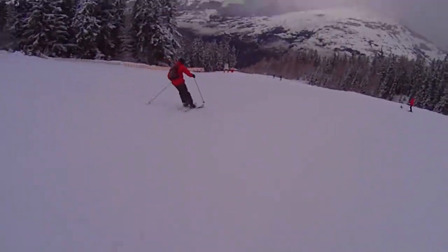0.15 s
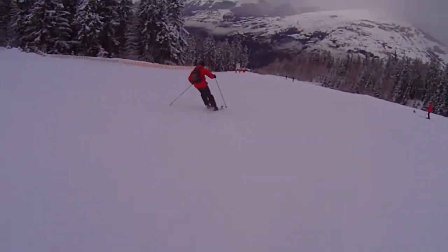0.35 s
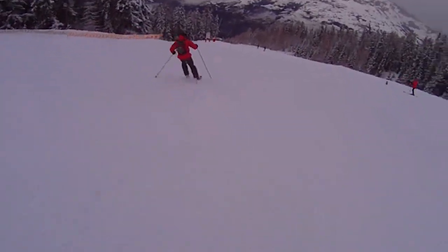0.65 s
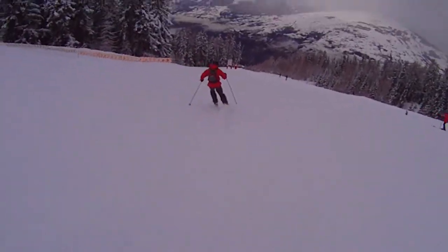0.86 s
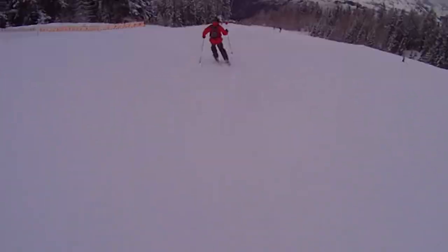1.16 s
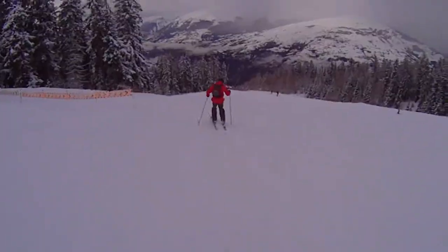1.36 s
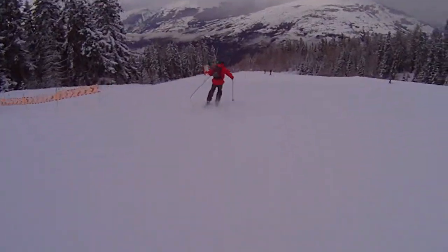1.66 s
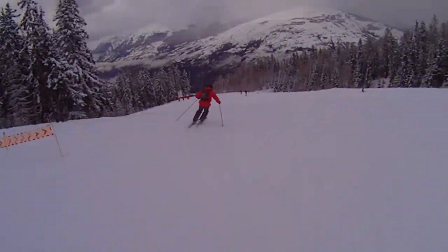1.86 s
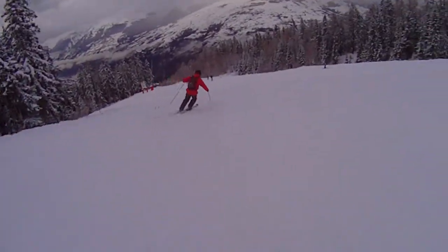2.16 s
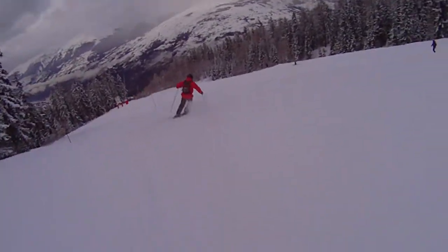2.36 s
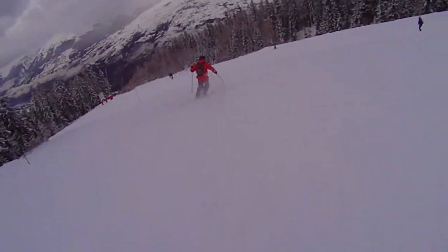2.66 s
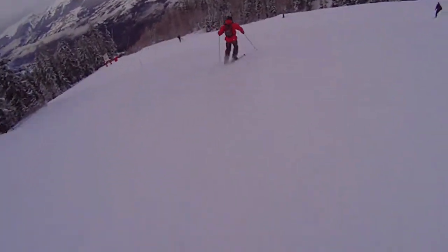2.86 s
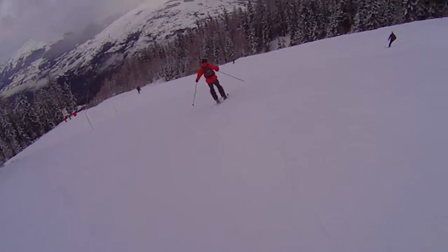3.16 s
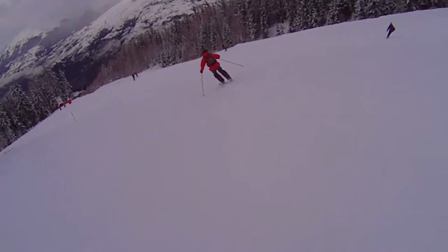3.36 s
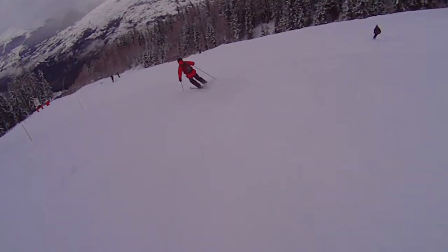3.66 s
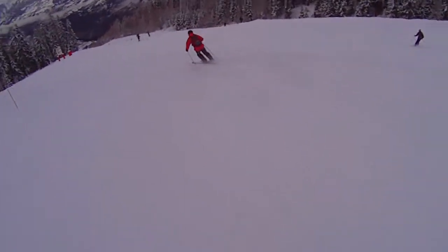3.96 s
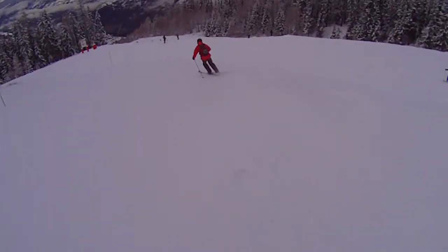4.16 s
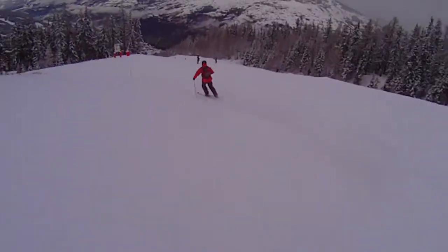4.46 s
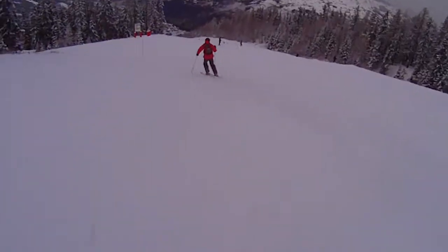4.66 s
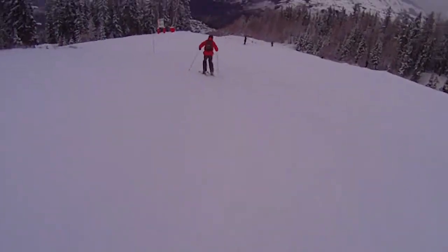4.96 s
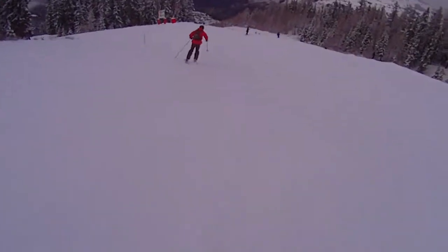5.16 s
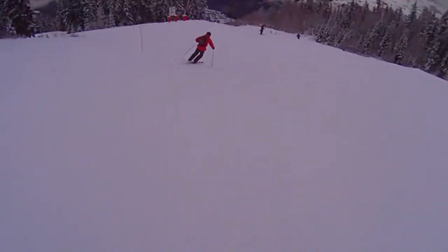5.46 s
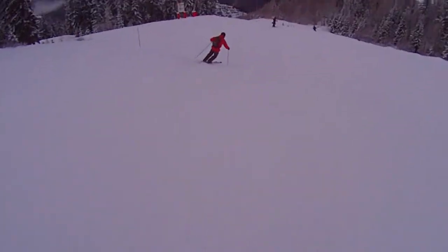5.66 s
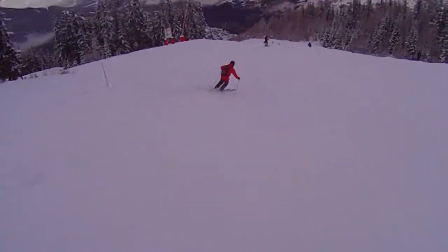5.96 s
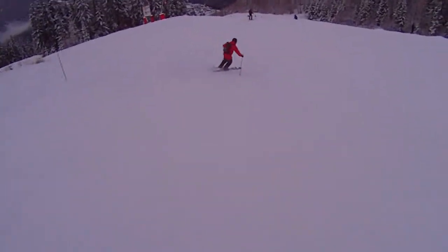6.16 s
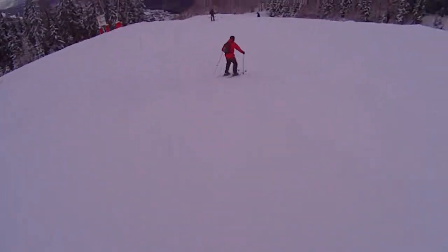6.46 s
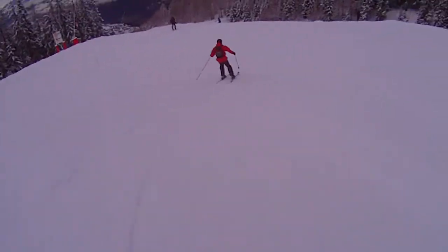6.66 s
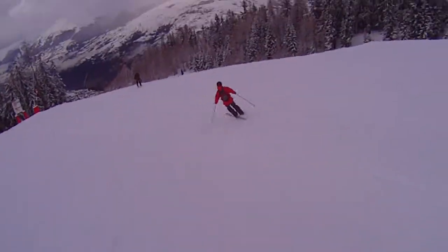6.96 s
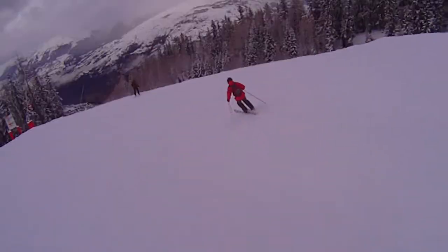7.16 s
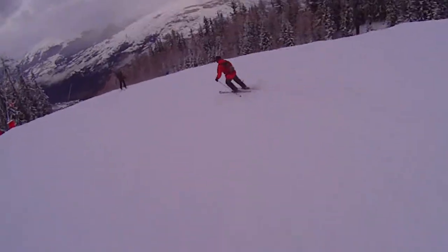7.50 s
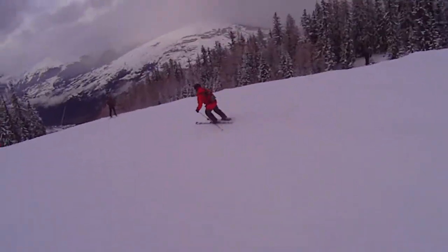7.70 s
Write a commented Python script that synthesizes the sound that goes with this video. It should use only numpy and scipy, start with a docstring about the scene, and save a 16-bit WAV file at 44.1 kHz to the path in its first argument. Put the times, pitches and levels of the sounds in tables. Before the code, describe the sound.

A small camera microphone in a plastic housing rides close to skis on packed snow. For the first second there is mostly a quiet, grainy gliding rustle with a boxy ring, faint hiss and a very faint high electronic whine. Around 1.2 s edges begin to grip, and hollow resonant skids slide upward to 1.7 s. Rough scraping continues to about 4.1 s, wavering, duller and chattering near 2 to 2.5 s, with sharp slaps near 1.9, 2.9 and 3.3 s. From 4.1 to 6 s the skis glide more quietly, broken by knocks, short edge scuffs and a fluttering wind tone. At 6 s hard scraping returns with brief airy whistles, peaks near 6.9 s, dips, then comes in gritty bursts with low hollow skids to the end. Bright snow ticks strike the housing, especially around 5.5, 6.9 and 7.3 s.

```python
"""Skiing down a packed piste

Heard from a small camera microphone in a plastic housing, close to the skis, wind and thrown snow.
Flat skis rustle as filtered grain noise; in turns the edges scrape in bands of grains that bunch and waver,
with sliding resonances for skids and short bursts for slaps over ruts. Wind is unsteady tones and low noise;
thrown snow is bright clicks and noise on the housing; the electronics are steady sines over a faint hiss."""
import sys
import numpy as np
from scipy import signal
from scipy.fft import rfft, irfft
from scipy.io import wavfile

SR = 44100
rng = np.random.default_rng(int(sys.argv[2]) if len(sys.argv) > 2 else 0)


def to_wav(s):
    """Save 16-bit WAV."""
    ch = np.atleast_2d(s).T  # columns
    pcm = np.round(np.clip(ch, -1, 1) * 32767)  # PCM
    wavfile.write(sys.argv[1], SR, pcm.astype(np.int16))


N = 345303
TIME = np.arange(N) / SR  # seconds


def from_db(db):
    """Decibels to gain."""
    return 10 ** (np.asarray(db) / 20)


def rms_one(x):
    """Scale to unit rms."""
    return x / np.sqrt(np.mean(x ** 2) + 1e-20)


def in_time(rows):
    """Interpolate each column of a table, after its time column, to every sample."""
    seconds, *columns = np.transpose(rows)
    return [np.interp(TIME, seconds, column) for column in columns]


def swell(s, half_length, db):
    """A bell-shaped rise and fall round time s, as a gain; half_length in s is where it drops to 1/e."""
    gain = np.zeros(N)
    near = np.abs(TIME - s) < 4 * half_length
    gain[near] = from_db(db) * np.exp(-((TIME[near] - s) / half_length) ** 2)
    return gain


def drift(rate):
    """Smooth random wander of rms 1 that changes about rate times a second."""
    step = 20  # samples between the slow values
    pole = np.exp(-2 * np.pi * rate * step / SR)
    settle = 4000  # slow values dropped while the filter settles
    noise = rng.standard_normal(N // step + settle + 2)
    slow = signal.lfilter([1], [1, -2 * pole, pole * pole], noise)[settle:]
    return np.interp(np.arange(N) / step, np.arange(len(slow)), rms_one(slow))


def colour(x, spectrum, size=2048):
    """Causal minimum-phase filter with the given spectrum; white noise keeps its power."""
    hz, db = np.transpose(spectrum)
    grid = np.maximum(np.arange(size // 2 + 1) * SR / size, 1)
    # beyond the listed range the response falls away on both sides
    outside = np.minimum(grid / hz[0], 1) * np.minimum(hz[-1] / grid, 1) ** 2
    gain = rms_one(from_db(np.interp(np.log(grid), np.log(hz), db)) * outside)
    # folding the cepstrum puts all the energy as early as it can be
    cepstrum = irfft(np.log(gain))[:size // 2]
    cepstrum[1:] *= 2
    response = irfft(np.exp(rfft(cepstrum, size)))
    return signal.oaconvolve(x, response)[:N]


def cut(x, hz, kind, order=4):
    """Butterworth filter."""
    return signal.sosfilt(signal.butter(order, hz, kind, fs=SR, output="sos"), x)


def grains(per_s, spread_db):
    """Snow crystals break at random: many small clicks, a few large; rms 1."""
    sizes = from_db(spread_db * np.minimum(rng.exponential(1, N), 4))
    signs = rng.choice([-1, 1], N)
    breaks = rng.random(N) < per_s / SR
    return rms_one(sizes * signs * breaks)


# Steady whine of the camera electronics. Each row: pitch in Hz, rms level in dB.
WHINE_TONES = [(7777, -91), (7837.5, -80.5), (7897.3, -79.5), (7957.3, -87)]
SELF_NOISE_DB = -71.5  # even hiss, rms


def electronics():
    """Steady sines and a narrow band of noise round them, over an even hiss."""
    whine = sum(from_db(db) * np.sqrt(2) * np.sin(2 * np.pi * hz * TIME) for hz, db in WHINE_TONES)
    noisy_edge = rms_one(cut(rng.standard_normal(N), [7600, 8250], "band", order=1))
    hiss = rms_one(cut(rng.standard_normal(N), 8200, "low", order=1))
    return whine + from_db(-75.5) * noisy_edge + from_db(SELF_NOISE_DB) * hiss


def air_tone(hz, waver_hz, flutter_db):
    """Eddies shed from an edge make a narrow tone, unsteady in pitch and level; rms 1."""
    phase = 2 * np.pi * np.cumsum(hz + waver_hz * drift(72.3)) / SR
    return rms_one(from_db(flutter_db * drift(40)) * np.sin(phase))


# Airstream tone at the housing's edge. Each row: time in seconds, pitch in Hz, level in dB.
EDGE_TONE = [(0, 1100, -78), (.6, 1025, -51), (.8, 983, -50), (1.15, 1110, -42.5), (1.5, 998, -58),
             (4.2, 867, -51), (4.35, 955, -51), (4.5, 900, -53), (4.75, 916, -53), (4.98, 1020, -45.5),
             (5.25, 907, -49.5), (5.7, 965, -45), (7.83, 1095, -53)]
# A gust whistles in a gap. Each row: centre in seconds, half length in seconds, pitch in Hz, level in dB.
WHISTLES = [(6.063, 0.037, 1330, -28), (6.148, 0.007, 1260, -17), (6.384, 0.032, 1266, -24)]
# A gust presses on the housing. Each row: centre in seconds, half length in seconds,
# peak level in dB before the lumpiness.
GUSTS = [(1.895, 0.14, -48), (2.498, .25, -47), (3.5, 0.28, -65), (4.654, 0.075, -51), (4.813, .035, -49),
         (5.504, 0.32, -62.5), (7.42, 0.2, -44.5)]
BREEZE_DB = -72  # buffeting between the gusts, before the lumpiness


def wind():
    """Eddies give an edge tone and brief whistles; gusts swell a soft, lumpy low noise."""
    gusts = from_db(BREEZE_DB) + sum(swell(s, length, db) for s, length, db in GUSTS)
    eddies = rms_one(cut(rng.standard_normal(N), [48, 170], "band", order=2))
    lumpiness = from_db(1.0 + 1.9 * drift(9.7))
    buffet = eddies * gusts * lumpiness
    tone_hz, tone_db = in_time(EDGE_TONE)
    edge_tone = from_db(tone_db) * air_tone(tone_hz, waver_hz=44, flutter_db=3.5)
    whistles = 0
    for s, length, hz, db in WHISTLES:
        whistles = whistles + swell(s, length, db) * air_tone(hz, waver_hz=14, flutter_db=1.8)
    return edge_tone + whistles + buffet


# A lump of snow hits the housing. Each row: time in seconds, strength in dB before a fixed boost and colour.
LUMPS = [(1.3214, -39), (2.7144, -39), (4.8359, -43), (5.5104, -34), (5.5344, -46), (5.667, -47),
         (6.8915, -27), (7.2779, -48), (7.307, -31), (7.3462, -45), (7.3816, -33), (7.4014, -42),
         (7.642, -36.5), (7.7927, -49)]
# Fine snow sprays on the housing. Each row: centre in seconds, half length in seconds, peak level in dB.
SPRAY = [(2.723, 0.033, -61), (5.536, 0.016, -53.5), (5.676, 0.02, -59), (7.356, 0.1, -55),
         (7.63, 0.075, -65), (7.81, 0.033, -58)]
# A puff of powder brushes the housing: centre in seconds, half length in seconds, peak level in dB.
POWDER = (0.54, 0.12, -65)
# Thin, bright colour of snow on the housing. Each row: frequency in Hz, relative density in dB per Hz.
TICK_COLOUR = [(2000, -20), (5000, -11), (7000, -4), (9000, -4), (11500, -9), (15000, -18)]


def thrown_snow():
    """Lumps, fine spray and powder strike the housing directly, so they sound thin and bright."""
    clouds = sum(swell(s, length, db) for s, length, db in SPRAY)
    spray = clouds * grains(per_s=260, spread_db=2.5)
    powder = swell(*POWDER) * rng.standard_normal(N)
    hits = spray + powder
    for s, strength_db in LUMPS:
        hits[round(s * SR)] += from_db(strength_db + 6.0)
    return colour(hits, TICK_COLOUR)


# The bases running flat. Each row: time in seconds, level in dB before a fixed trim and the quick scratches.
GLIDE_LEVEL = [(0, -41.5), (.15, -41), (.35, -36.5), (.8, -38.5), (1.2, -37), (4.1, -40.5), (4.6, -38.5),
               (4.95, -39), (5.17, -31.5), (5.3, -41.5), (5.7, -37), (7.83, -36)]
# Colour of the rustle with the housing's ring. Each row: frequency in Hz, relative density in dB per Hz.
GLIDE_COLOUR = [(40, -30.5), (170, -19), (450, -19.5), (800, -16.5), (1000, -9.5), (1220, -4), (1420, 1.5),
                (1750, -8), (2400, -13), (3000, -8), (3600, -13), (4700, -32.5), (5700, -30.5),
                (7000, -41.5)]


def glide():
    """Flat bases rustle in quick scratches; the colour's peak is the housing's cavity ringing."""
    level_db, = in_time(GLIDE_LEVEL)
    scratches = from_db(1.43 * drift(90))
    rustle = grains(per_s=6000, spread_db=3.0) * scratches
    return from_db(level_db - 1.34) * colour(rustle, GLIDE_COLOUR)


# Colour of cracking ice. Each row: frequency in Hz, relative density in dB per Hz.
CRUMB_COLOUR = [(300, -14.5), (900, 4.5), (1450, 13), (2400, 0.5), (3400, 0), (4700, -23.5), (5900, -26.5),
                (7500, -30), (13000, -58)]
STRAY_CRUMBS_DB = -55  # the odd crumb under a flat ski, rms before the colour


def crumbs(level_db, bite_db):
    """Icy crumbs crack under the skis, louder as the edges bite, over sparse strays at a constant level."""
    cracks = from_db(0.63 * (level_db + bite_db) - 16.5) * grains(per_s=170, spread_db=2.6)
    strays = from_db(STRAY_CRUMBS_DB) * grains(per_s=14, spread_db=2.0)
    return colour(cracks + strays, CRUMB_COLOUR)


# A ski slaps over a rut. Each row: time in seconds, strength in dB before the mix and colour,
# low thud against the clack in dB before their own trims.
RUTS = [(0.245, -17, -30), (1.841, -7, -16), (1.939, -4.5, -10), (2.428, -17, -5), (2.463, -18, -20),
        (2.641, -6, -11), (2.808, -10, -1), (2.837, -8, 1.5), (2.875, -2, -22), (3.279, -10, -10),
        (3.312, 0, -22), (4.167, -18.5, -10), (4.338, -14, -14), (4.608, -18, -1), (4.636, -2.5, -24),
        (4.738, -14, -24), (4.78, -10, -29), (5.043, -18, -30), (5.097, -15, -11), (5.189, -7, -21),
        (5.282, -16, -8), (5.358, -29, 4), (5.407, -8, -26), (5.555, -13, -10), (5.784, -9.5, -2),
        (5.83, -11, 6), (5.871, -25, -11), (6.053, -4, -8), (6.936, -3, -24), (6.99, -5, -7),
        (7.454, -1, -24), (7.588, -5, -6)]
# Colour of edges scraping and of thuds. Each row: frequency in Hz, relative density in dB per Hz.
SCRAPE_COLOUR = [(50, -32.5), (100, -17.5), (190, -7), (350, -2), (650, 1), (1000, 0.5), (1500, -4.5),
                 (2400, -9), (3400, -7), (4100, -23.5), (4800, -30.5), (5800, -31), (7000, -50),
                 (12000, -63)]


def ruts(rise_s=0.0005, decay_s=0.0048):
    """Each slap starts with a crack, crushes a burst of crystals and thumps the ski."""
    crack, clack, thud = np.zeros((3, N))
    age = TIME[:SR // 10]
    burst = (1 - np.exp(-age / rise_s)) * np.exp(-age / decay_s)
    for s, strength_db, thud_db in RUTS:
        at = round(s * SR)
        pulse = from_db(strength_db) * burst[:N - at]
        crack[at] = from_db(strength_db)
        clack[at:at + len(age)] += pulse
        thud[at:at + len(age)] += from_db(thud_db) * pulse
    crystals = grains(per_s=8000, spread_db=0)
    bright = colour(from_db(-14.0) * crack + from_db(-13.0) * clack * crystals, CRUMB_COLOUR)
    thump = colour(thud * grains(per_s=5000, spread_db=0), SCRAPE_COLOUR)
    return bright + from_db(-11.0) * cut(thump, 1000, "low", order=2)


# A ski goes light as it crests a rut, just before it slaps down.
LIFT_DB, LIFT_LEAD_S, LIFT_HALF_LENGTH_S = 3.5, 0.013, 0.008


def lift():
    """How light the skis are on the snow, 0-1, swelling just before each rut."""
    swells = sum(swell(s - LIFT_LEAD_S, LIFT_HALF_LENGTH_S, 0) for s, *_ in RUTS)
    return np.minimum(swells, 1)


# A skidding ski rings hollow. Each row: centre in seconds, half length in seconds, pitch at the centre in Hz
# before the glide, glide in octaves per second, level in dB at the top of the bell.
SKIDS = [(1.328, 0.079, 960, 7.5, -30), (1.426, 0.066, 1810, 2.5, -25.5), (1.604, 0.16, 1760, 1.5, -27),
         (5.147, 0.063, 1770, -1.5, -33), (5.487, 0.031, 1250, 5, -28), (5.955, 0.027, 1420, 7.5, -24),
         (6.096, 0.055, 1406, 0, -21), (7.203, 0.032, 670, -19, -21.5), (7.514, 0.033, 707, -4.5, -20),
         (7.609, 0.039, 590, -11, -20.5)]


def skids(width=0.29):
    """Grains drum on a flexing ski; its broad resonance slides as the pressure moves along the edge."""
    out = np.zeros(N)
    drumming = grains(per_s=5500, spread_db=5.0)
    for s, length, hz, glide_rate, db in SKIDS:
        near = np.abs(TIME - s) < 3 * length
        since = TIME[near] - s
        phase = 2 * np.pi * np.cumsum(hz * 2 ** (glide_rate * since)) / SR
        # shift the moving pitch to 0 Hz, keep a band round it, shift back
        shifted = drumming[near] * np.exp(-1j * phase)
        ringing = cut(shifted, width * hz / 2, "low", order=2) * np.exp(1j * phase)
        bell = np.exp(-(since / length) ** 2)
        out[near] += from_db(db) * bell * rms_one(ringing.real)
    return out


# Long skidded scraping in two stretches, 1.36-4.1 s (early and late part) and 6.04-7.83 s.
# Each row: time in seconds, scrape level in dB before lift and roughness,
# depth (low chatter against the scrape) in dB, bite (hiss against the scrape) in dB.
FIRST_STRETCH_EARLY = [(1.358, -34, -8, 2.5), (1.415, -33.5, 1, 7), (1.502, -18.5, -14, -0.5),
                       (1.742, -21, -11, -1), (1.813, -26.5, -2, -12.5), (1.92, -24, -3.5, -14.5),
                       (1.99, -21, -10.5, -7), (2.18, -23, -0.5, -5.5), (2.316, -23, -5.5, -13.5),
                       (2.349, -39.5, 13, -14)]
FIRST_STRETCH_LATE = [(2.353, -44, 1.5, -27.5), (2.422, -33, 10, -12.5), (2.52, -28.5, -1, -10.5),
                      (2.761, -23, -4, -8.5), (2.851, -26.0, -7, -8.5), (3.129, -26, -6.5, -5.5),
                      (3.314, -18.5, -12, -7), (3.412, -25.5, -10, -10), (3.701, -27.5, -5.5, -9.0),
                      (4.019, -22.5, -16, -11.5), (4.115, -36, -24, -28)]
LAST_STRETCH = [(6.04, -30.5, -14.0, -5), (6.068, -21.5, -11, -3.5), (6.249, -22, -4.5, -3.5),
                (6.602, -23, -7.5, 1), (6.86, -17.5, -7.5, 0.5), (6.995, -17, -6.5, -10),
                (7.065, -31, 5, -5), (7.268, -25.5, 1, -8), (7.448, -19.5, -7, -5), (7.549, -26, 0, -6.5),
                (7.83, -24, 0, -9.5)]
# An edge catches briefly. Each row: start in seconds, hold in seconds, scrape level in dB before
# the dig, easing, lift and roughness, depth in dB, bite in dB.
GRABS = [(0.002, 0.011, -55, -19, 17.5), (0.49, 0.19, -44, -8, 4), (1.042, 0.083, -36, -23, -23),
         (1.107, 0.028, -30.0, -24, -7.5), (1.228, 0.11, -23.5, -15.5, -9.0),
         (1.833, 0.0062, -23.5, -1, -0.5), (1.934, 0.034, -18.5, -3.5, -6), (2.264, 0.021, -23, -11, -7),
         (2.424, 0.051, -22.5, 2.5, -6.5), (2.512, 0.034, -24.5, 0, -4.5), (2.597, 0.058, -20, -14, -11),
         (2.706, 0.02, -23, -4, -2.5), (3.549, 0.078, -20, -19, -12), (4.532, 0.1, -51.5, 1, 7),
         (4.629, 0.015, -26, -2, -5), (4.738, 0.022, -50, 9, 6), (4.783, 0.048, -40.5, 1, 3),
         (5.062, 0.034, -47, 5, -6), (5.113, 0.1, -40.5, 2, 2.5), (5.306, 0.019, -38.5, 4, -8.5),
         (5.35, 0.066, -25.5, -7.5, -15.5), (5.472, 0.042, -30, -23, -7), (5.56, 0.028, -29, -9, -28),
         (5.594, 0.046, -23, -15, -11), (5.78, 0.066, -23.5, -10, -11), (5.865, 0.12, -26.5, -19, -8),
         (6.908, 0.087, -14.5, -9, -8), (7.159, 0.026, -15.5, -18, -6.5), (7.329, 0.056, -21.0, -13, -4.0),
         (7.447, 0.066, -21, -1, -4), (7.594, 0.059, -20.5, -12, -6), (7.773, 0.043, -21.0, -17, -8)]
# An edge takes hold quickly, eases while it holds, then lets go.
ATTACK_S, EASE_DB_PER_S, RELEASE_DB_PER_S = 0.0018, 21.5, 522.5
# A catching edge bites hardest as it first digs in.
DIG_DB, DIG_S = 0.5, 0.0065


def edge_contacts():
    """Long scrapes follow their tables; each grab digs in, eases and lets go: (gain, depth dB, bite dB)."""
    for scrape in (FIRST_STRETCH_EARLY, FIRST_STRETCH_LATE, LAST_STRETCH):
        level_db, depth_db, bite_db = in_time(scrape)
        outside_s = np.abs(TIME - np.clip(TIME, scrape[0][0], scrape[-1][0]))
        fall_db = np.minimum(RELEASE_DB_PER_S * outside_s, 200)
        yield from_db(level_db - fall_db), depth_db, bite_db
    for start, hold, level_db, depth_db, bite_db in GRABS:
        age = np.clip(TIME - start, 0, .5)
        attack = np.minimum(age / ATTACK_S, 1)
        dig_db = DIG_DB * np.exp(-age / DIG_S)
        fall_db = EASE_DB_PER_S * age + RELEASE_DB_PER_S * np.maximum(age - hold, 0)
        yield attack * from_db(level_db + dig_db - fall_db), depth_db, bite_db


def edge_pressure():
    """Contacts add in power; gives the level, depth and bite (dB) of all edges together."""
    scrape, chatter, hiss = np.full((3, N), 1e-12)
    for gain, depth_db, bite_db in edge_contacts():
        scrape += gain ** 2
        chatter += (gain * from_db(depth_db)) ** 2
        hiss += (gain * from_db(bite_db)) ** 2
    return 10 * np.log10([scrape, chatter / scrape, hiss / scrape])


# Uneven snow makes the pressure wobble.
UNEVEN_DB, UNEVEN_PER_S = 0.7, 8.5


def edges(level_db, depth_db, bite_db, usual_depth_db=-7.0, usual_bite_db=-2.5):
    """The edges grip and slip: grains come in quick bunches, their lows and highs set by depth and bite."""
    # a deep, dull scrape is a chattering ski; a bright one is a smooth skid
    roughness_db = np.clip(1.5 + 0.1 * (depth_db - bite_db), .4, 4)
    grip_db = level_db + roughness_db * drift(105) + UNEVEN_DB * drift(UNEVEN_PER_S)
    limits = np.geomspace(40, 16000, 15)  # band limits, Hz
    out = 0
    for low, high in zip(limits, limits[1:]):
        log_hz = np.log(low * high) / 2
        # deep flexing swells the lows, a hard bite the highs
        flex = np.interp(log_hz, np.log([120, 330, 900]), [1.1, 1, 0])
        skid = np.interp(log_hz, np.log([950, 2100, 7000]), [0, 1, 1.15])
        tilt_db = flex * (depth_db - usual_depth_db) + skid * (bite_db - usual_bite_db)
        gain_db = grip_db + tilt_db + 0.25 * drift(32)
        band = cut(grains(per_s=6000, spread_db=2.5) * from_db(gain_db), [low, high], "band", order=3)
        out = out + band
    return from_db(-0.26) * colour(out, SCRAPE_COLOUR)


def scene():
    """Electronics, wind, thrown snow and skis sum in one channel."""
    surroundings = electronics() + wind() + thrown_snow()
    pressure_db, depth_db, bite_db = edge_pressure()
    level_db = pressure_db - LIFT_DB * lift()
    running = glide() + crumbs(level_db, bite_db) + ruts()
    turning = skids() + edges(level_db, depth_db, bite_db)
    return (surroundings + running + turning)[None]


CUTOFF_HZ = 15300


def record(dry):
    """A steep elliptic low-pass cuts the top."""
    return signal.sosfilt(signal.ellip(10, .1, 80, CUTOFF_HZ, fs=SR, output="sos"), dry)


dry = scene()
out = record(dry)
to_wav(out)
```